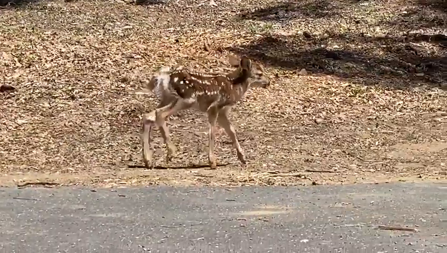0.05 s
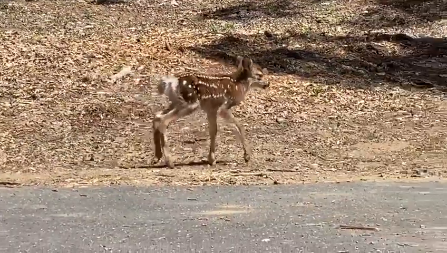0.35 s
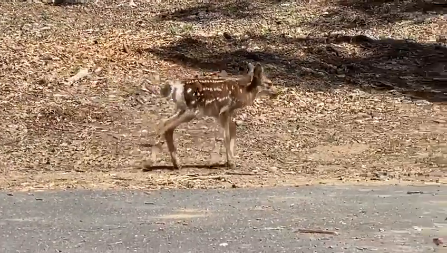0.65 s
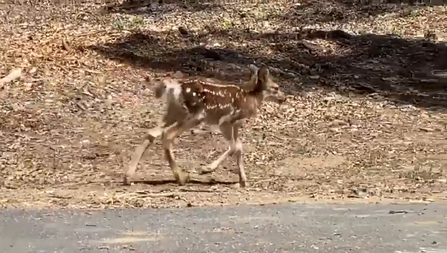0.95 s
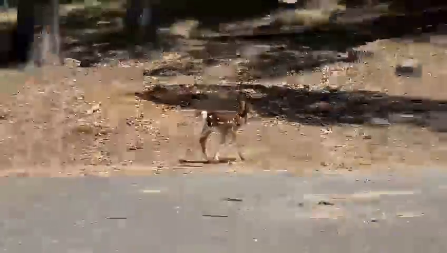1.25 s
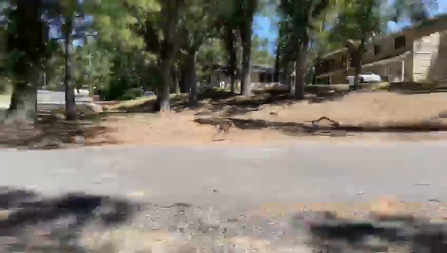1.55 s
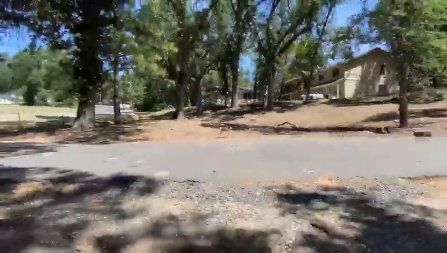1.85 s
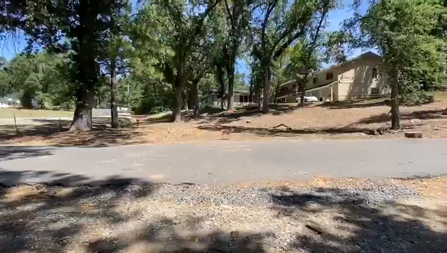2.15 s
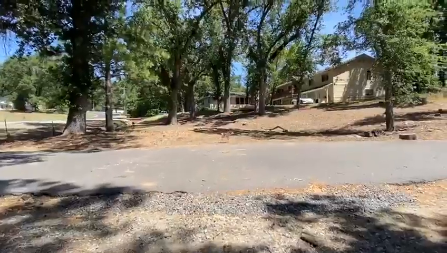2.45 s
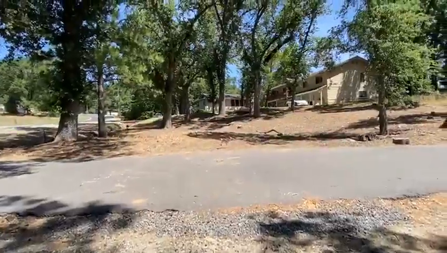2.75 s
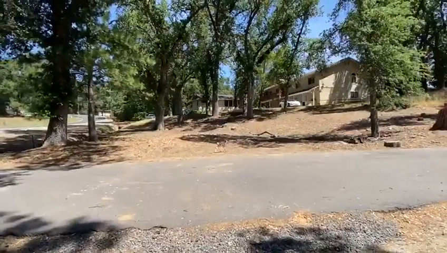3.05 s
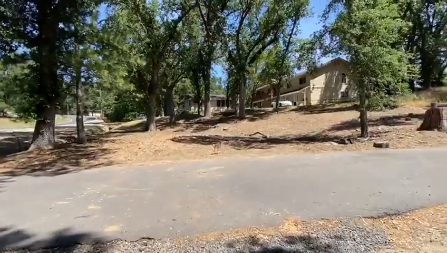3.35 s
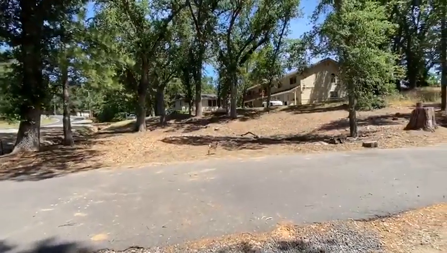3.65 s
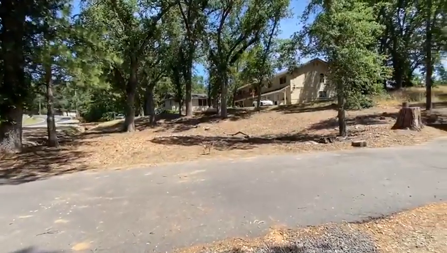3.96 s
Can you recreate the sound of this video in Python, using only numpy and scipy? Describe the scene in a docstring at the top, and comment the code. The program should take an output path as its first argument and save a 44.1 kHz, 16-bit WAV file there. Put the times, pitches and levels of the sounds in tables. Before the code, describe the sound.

A young deer bleats once, short and nasal, over soft outdoor air and a low, faraway machine hum. Close handling noise follows: skin slides on the microphone's case and the grip creaks in quick, sharp ticks.

```python
"""Beside a quiet wooded road, a fawn gives one thin, arching bleat, a harmonic tone shaped by the
resonances of mouth and nose. Before it come the dying end of an earlier bleat, a faint chirp and a far,
hoarse call, all over soft air and the low hum of distant machinery. Then a hand shifts on the recorder:
sliding skin makes friction noise, and stick-slip of the grip rings the modes of the case in sharp
double ticks, about six a second, nearer the left microphone port."""
import sys
import numpy as np
from scipy import signal
from scipy.fft import rfft, irfft
from scipy.io import wavfile
from scipy.ndimage import uniform_filter1d

SR = 44100
rng = np.random.default_rng(int(sys.argv[2]) if len(sys.argv) > 2 else 0)


def generate_wav(sig):
    """Save sig (samples, or channels by samples) to the path in sys.argv[1] as 16-bit PCM at SR."""
    pcm = np.round(np.clip(np.atleast_2d(sig).T, -1, 1) * 32767).astype(np.int16)
    wavfile.write(sys.argv[1], SR, pcm)


N = 176400
TIME = np.arange(N) / SR
PORT_LAG_S = .00013  # the hand's sounds reach the right port later


def undb(db):
    """Amplitude ratio of a level."""
    return 10 ** (np.asarray(db) / 20)

def unit(x):
    """Normalisation to rms 1."""
    return x / np.sqrt(np.mean(x ** 2))

def curves(rows):
    """Linear interpolation of each column of a time table."""
    times, *columns = np.array(rows, float).T
    return [np.interp(TIME, times, column) for column in columns]

def gain_at(hz, envelope):
    """Gain of a spectral envelope, interpolated in log frequency."""
    f, db = np.array(envelope, float).T
    return undb(np.interp(np.log(hz + 1e-3), np.log(f), db))

def wander(rate_hz):
    """Smooth random modulation with a spread near 1."""
    k = int(SR / rate_hz)
    steps = np.repeat(rng.standard_normal(N // k + 1), k)
    return 1.34 * uniform_filter1d(uniform_filter1d(steps, k), k)[:N]

def colour(x, envelope):
    """Filtering by a spectral envelope, to rms 1."""
    return unit(irfft(rfft(x) * gain_at(np.fft.rfftfreq(N, 1 / SR), envelope), N))

def noise(correlation):
    """Partly correlated white noise at the two ports."""
    common = np.sqrt(correlation) * rng.standard_normal(N)
    return common + np.sqrt(1 - correlation) * rng.standard_normal((2, N))

def pan(db):
    """Gains for a level difference, left over right."""
    return undb(np.array([[db], [-db]]) / 2)

def delay(x, seconds):
    """Fractional delay by linear phase shift."""
    return irfft(rfft(x) * np.exp(-2j * np.pi * np.fft.rfftfreq(N, 1 / SR) * seconds), N)

def reverberate(x, decay_s):
    """Convolution with exponentially decaying diffuse reflections."""
    cloud = rng.standard_normal(SR // 2) * np.exp(-np.arange(SR // 2) / SR / decay_s)
    return signal.fftconvolve(x, cloud / np.linalg.norm(cloud))[:N]


# Partials of the hum: f/Hz, level/dB, modulation depth/dB
HUM_PARTIALS = [(53.8, -56, -0.5), (75.9, -61.5, 4.5), (107.5, -69, 9), (121.5, -66, 4), (161.2, -75, -1.5)]
# Spectral envelope of the rumble: f/Hz, relative level/dB
RUMBLE_SPECTRUM = [(20, -20.5), (40, 2.5), (62, 5.5), (85, 1.5), (130, -1), (200, -19.5), (400, -51.5)]
# Slow fading of both: t/s, relative level/dB
MACHINE_FADE = [(0, -0.5), (1.5, -2.5), (2.8, -2), (3.1, -10), (3.6, -6.5), (4, -4)]

def machinery():
    """Random amplitude and frequency modulation makes a distant hum waver over low rumble."""
    hum = 0
    for hz, db, depth_db in HUM_PARTIALS:
        phase = 2 * np.pi * np.cumsum(hz * (1 + .0087 * wander(5.88))) / SR
        hum += np.sqrt(2) * undb(db + depth_db * np.tanh(wander(6.6))) * np.sin(phase)
    rumble = undb(-61) * colour(noise(correlation=.2), RUMBLE_SPECTRUM)
    return (hum + rumble) * pan(db=-1) * undb(curves(MACHINE_FADE)[0])


# Spectral envelope of outdoor air: f/Hz, relative level/dB
AIR_SPECTRUM = [(100, -13.5), (160, -5), (350, -7), (550, -12.5), (950, -14.5), (1400, -22.5),
                (2000, -25.5), (2700, -34), (4500, -40.5), (7000, -42), (9000, -70), (11000, -79)]

def air(level_db=-68, swell_db=1):
    """Broadband ambient noise swells slightly under slow amplitude modulation."""
    hush = colour(noise(correlation=.71), AIR_SPECTRUM)
    return hush * undb(level_db + swell_db * np.tanh(wander(1.86)))


# The earlier bleat's end, then the full bleat: t/s, f/Hz, level/dB of fundamental, mouth and nasal buzz
DYING_BLEAT = [(0, 886, -69, -62, -78), (.04, 830, -81, -73.5, -101), (.08, 825, -98, -88, -100)]
FULL_BLEAT = [(1.62, 914, -74, -84, -80), (1.634, 930, -71, -74, -66.5), (1.654, 1030, -60, -63.5, -54.5),
              (1.676, 1042, -56.5, -64, -55.5), (1.70, 1060, -60, -57.5, -62),
              (1.733, 1060, -60.5, -54.5, -62), (1.747, 1055, -64, -65, -63.5),
              (1.77, 1025, -60.5, -59, -58), (1.792, 1019, -62.5, -55, -69), (1.801, 980, -62, -41.5, -62),
              (1.822, 950, -67, -44, -65.5), (1.848, 880, -75, -52.5, -69), (1.875, 870, -70, -57, -80.5),
              (1.91, 830, -74, -81, -100)]
# Spectral envelopes of the mouth and of the nasal buzz: f/Hz, relative level/dB
MOUTH_FORMANTS = [(1650, -2), (1900, 0), (2150, -3), (2550, -27), (2850, -24.5), (3200, -16), (3400, -36.5),
                  (3750, -19.5), (4100, -57), (4750, -29), (5700, -41), (6600, -26), (7600, -49)]
NASAL_SPECTRUM = [(5000, -82), (6300, -37), (7100, -25), (7450, -3.5), (7800, -12), (8400, -6), (9000, -8),
                  (9450, -1.5), (10000, -3), (10600, -4.5), (11300, -42)]

def fawn(call, opens_s, overtone_db, phase_spread, opening_s=.073, jitter=.003, shimmer_db=.9):
    """Source and filter: mouth and nose weight a harmonic voice, which rasps as the mouth opens."""
    hz, fundamental_db, mouth_db, buzz_db = curves(call)
    hz = uniform_filter1d(hz, size=SR // 70) * (1 + jitter * wander(150))
    opening = np.clip((TIME - opens_s) / opening_s, 0, 1)
    nasal_hz = np.where(TIME > opens_s - .13, 8300, 9900)  # the nasal resonance steps down
    rasp_rate_hz = 521.2
    rasp = .13 * np.maximum(opening, .12) * wander(rasp_rate_hz)
    phase = 2 * np.pi * np.cumsum(hz) / SR + rasp / 3
    voiced = (TIME > call[0][0]) & (TIME < call[-1][0])
    envelope = np.sqrt(2) * uniform_filter1d(1. * voiced, SR // 200)
    envelope *= (1 + rasp) * undb(shimmer_db * wander(65))
    oral = undb(fundamental_db) * np.sin(phase)
    oral += undb(mouth_db) * gain_at(2 * hz, MOUTH_FORMANTS) * np.sin(2 * phase)
    buzz = 0
    for k in range(3, 14):
        muffle_db = (-20 if k > 3 else -3) * (1 - opening)  # a closed mouth damps the overtones
        hoarse = np.sin(k * phase + phase_spread * (1 + opening) / 2 * wander(rasp_rate_hz))
        oral += hoarse * gain_at(k * hz, MOUTH_FORMANTS) * undb(mouth_db + overtone_db + muffle_db)
        peak_db = 7 * np.exp(-((k * hz - nasal_hz) / 670) ** 2)
        flicker_db = 2.8 * wander(44.43)
        buzz += np.sin(k * phase) * gain_at(k * hz, NASAL_SPECTRUM) * undb(buzz_db + peak_db + flicker_db)
    return envelope * (oral * pan(db=-2.5) + buzz * pan(db=9.5))

def woods(voice, echo_db=-15.5, t60_s=.14, echo_delay_s=.018):
    """Scattering by the trees adds a short reverberation to the direct sound."""
    left, right = voice
    direct = np.array([left, delay(right, seconds=.00005)])
    echo = [delay(reverberate(side, t60_s / np.log(1000)), echo_delay_s) for side in voice]
    return direct + undb(echo_db) * np.array(echo)


def bird(at_s=.194, half_length_s=.035, hz=4720, peak_db=-85):
    """A frequency-modulated tone under a Gaussian envelope makes one thin, distant chirp."""
    phase = 2 * np.pi * np.cumsum(hz * (1 + .022 * wander(400))) / SR
    return undb(peak_db) * np.exp(-((TIME - at_s) / half_length_s) ** 2) * np.sin(phase)


# Contour of the far call: t/s, f/Hz, level/dB
FAR_CONTOUR = [(.48, 1567, -101), (.525, 1550, -81), (.61, 1603, -73.5), (.7, 1573, -75),
               (.81, 1544, -73.5), (.88, 1570, -75), (1.0, 1523, -75), (1.13, 1512, -74), (1.24, 1450, -91)]
# Spectral envelope of its hoarseness: f/Hz, relative level/dB
HOARSE_SPECTRUM = [(700, -31), (1200, -3.5), (1650, 3), (1950, -7), (2400, -25.5), (4000, -38)]

def far_call(waver=.03, hoarse_db=2.5):
    """Scattering by trees blurs a wavering note far to the left; a band of noise makes it hoarse."""
    hz, db = curves(FAR_CONTOUR)
    phase = 2 * np.pi * np.cumsum(hz * (1 + waver * wander(90.3))) / SR
    note = unit(reverberate(np.sin(phase), decay_s=.023))
    hoarseness = undb(hoarse_db) * colour(noise(correlation=.6), HOARSE_SPECTRUM)
    return unit(note + hoarseness) * undb(db) * pan(db=8)


# Slips of the grip: t/s, level/dB, tilt/(dB per octave), accent level/dB, accent f/Hz
GRIP_SLIPS = [(.517, -65, 11, -1, 5000), (1.09, -58, -8, 9, 560), (1.313, -58, 2, 4, 1430),
              (1.484, -53, -10, 17.5, 1900), (1.9965, -35, -2, 10.5, 1430), (2.2275, -37, -10.5, 15, 1300),
              (2.2555, -39.5, 8.5, 14.5, 1430), (2.4905, -33, 2.5, 12, 1470),
              (2.5502, -23.5, 4.5, 25, 1520), (2.6372, -26.5, -0.5, 14, 1400),
              (2.6680, -17, -4.5, 11.5, 1430), (2.6884, -19.5, -0.5, 0, 1430), (2.7317, -4.5, 0, 11.5, 990),
              (2.7895, -30.5, 4.5, 13, 1430), (2.8949, 2, -0.5, 7, 875), (2.8968, -19, 6.5, 0.5, 8500),
              (2.9032, -18.5, 4.5, 3, 1430), (3.0409, -2.5, -0.5, 5.5, 3950), (3.0442, -3.5, -1, -3, 1900),
              (3.1944, -10, -2.5, 18, 1140), (3.1963, -17.5, -9, -1, 950), (3.2009, -3, -0.5, 4.5, 875),
              (3.3530, -27, -11, -6, 1310), (3.3544, -6.5, -2.5, 10, 4360), (3.3612, -3.5, -2, 4, 1000),
              (3.5165, -17.5, 3, 3, 3400), (3.5186, -5.5, -3, 5.5, 1420), (3.5224, -15, -3, 8, 330),
              (3.6858, -31, 13, -4, 7000), (3.6867, -2, 0.5, 8.5, 1250), (3.6896, -11, -5, 3, 1430),
              (3.6921, -5.5, -3.5, -2, 437), (3.8627, -11.5, -2, 1, 1630),
              (3.8679, -10.5, -2.5, 13.5, 5000), (3.9575, -27.5, -5, 15.5, 1480)]
# Modes of the case: f/Hz, bandwidth/Hz, level/dB, right port relative to left/dB
CASE_MODES = [(330, 276, -3, -4.5), (584, 204, -4, -12), (949, 453, 1.5, -9), (1364, 386, 0.5, -3),
              (1900, 900, 3, 1), (3410, 920, 7.5, -15.5), (4264, 1280, 4.5, -12), (5075, 560, 5, -9),
              (5530, 430, -1.5, -20), (7200, 1040, 0.5, -17.5), (8970, 650, -5, -8),
              (10580, 820, -16.5, 2.5)]

def grip_creaks(squeak_s=2.7355, squeak_hz=1369.5, grit_db=-3.5, accent_octaves=.38):
    """Stick-slip friction: each slip is a gritty impulse that rings the modes, slightly detuned."""
    # seven rapid slips fuse into one squeak
    squeak = [(squeak_s + k / squeak_hz, -11, -3.5, 14, 1412) for k in range(7)]
    age = np.arange(-(SR // 200), SR // 50) / SR
    rise_s, decay_s = .0009, .00081
    ports = np.zeros((2, N + len(age)))
    for at_s, slip_db, tilt_db, accent_db, accent_hz in GRIP_SLIPS + squeak:
        grit = rng.standard_normal(len(age)) * np.exp(np.minimum(age / rise_s, -age / decay_s))
        push = (age == 0) + undb(grit_db) * grit / np.linalg.norm(grit)
        detune = 1 + .035 * rng.standard_normal()
        start = int((at_s + age[0]) * SR)
        for k, (hz, width_hz, mode_db, right_db) in enumerate(CASE_MODES):
            contact_db = accent_db * np.exp(-(np.log2(hz / accent_hz) / accent_octaves) ** 2)
            gain = undb(slip_db + mode_db + tilt_db * np.log2(hz / 2000) + contact_db)
            resonator = signal.iirpeak(hz * detune, hz / width_hz, fs=SR)
            mode = (-1) ** k * signal.lfilter(*resonator, signal.lfilter(*resonator, push))
            ports[:, start:start + len(age)] += gain * mode * undb([[0], [right_db]])
    return np.array([ports[0, :N], delay(ports[1, :N], PORT_LAG_S)])

def case_response(ticks, ring_db=-12.5, ring_top_hz=2500, gap_hz=2530, gap_width_hz=210):
    """Free decay and antiresonance: the case's low modes linger, and a notch lies between two modes."""
    tails = [reverberate(side, decay_s=.007) for side in ticks]
    ring = undb(ring_db) * signal.lfilter(*signal.butter(1, ring_top_hz, fs=SR), tails)
    hollow = signal.lfilter(*signal.iirnotch(gap_hz, gap_hz / gap_width_hz, fs=SR), ticks + ring)
    return signal.sosfilt(signal.butter(2, [200, 10500], "band", fs=SR, output="sos"), hollow)


# Course of the rubbing: t/s, scuff level/dB, hiss level/dB
RUB_LEVELS = [(1.6, -110, -130), (1.85, -66, -83), (2.05, -67.5, -85.5), (2.09, -62, -73.5),
              (2.2, -63, -72), (2.38, -56.5, -64), (2.52, -64, -69), (2.6, -61, -67.5), (2.7, -59, -67.5),
              (2.83, -61.5, -67), (3.0, -58, -64.5), (3.15, -60, -66), (3.3, -61.5, -67.5),
              (3.45, -62, -73), (3.62, -62, -71.5), (3.78, -62.5, -65.5), (3.9, -60, -67),
              (4.0, -61.5, -66.5)]
# Harder scrapes: t/s, half length/s, level/dB
SCRAPE_SWELLS = [(2.232, 0.013, -64), (2.394, 0.025, -65), (3.808, 0.074, -57.5), (3.975, 0.026, -56.5)]
# Spectral envelopes of scuff, hiss and scrape: f/Hz, relative level/dB
SCUFF_SPECTRUM = [(120, -8), (280, 2), (700, 1), (1300, 0), (1900, -5.5), (2700, -13), (4000, -41)]
HISS_SPECTRUM = [(1500, -8), (2800, 1), (3700, -2.5), (4700, 0.5), (5800, -3), (7100, 1.5), (8500, -6),
                 (9700, -12.5), (11000, -38.5)]
SCRAPE_SPECTRUM = [(400, -35), (700, 9), (1000, 0.5), (1600, 6), (2050, 2), (2450, -10), (2900, 2.5),
                   (3700, -18), (4700, -17), (6500, -26)]

def skin_rubbing(catches_per_s=900, spread_db=7):
    """Sliding friction: skin on the case makes noise full of tiny catches, modulated by its pressure."""
    scuff_db, hiss_db = curves(RUB_LEVELS)
    catches = (rng.random(N) < catches_per_s / SR) * rng.standard_normal(N)
    catches = unit(catches * undb(spread_db * np.minimum(rng.exponential(size=N), 2)))
    grains = undb(-8) * np.array([catches, delay(catches, PORT_LAG_S)])
    pressure = undb(2.3 * wander(45))
    scuff = colour(noise(correlation=.37) + grains, SCUFF_SPECTRUM) * undb(scuff_db)
    hiss = colour(noise(correlation=.028) + grains, HISS_SPECTRUM) * undb(hiss_db)
    swells = sum(undb(db) * np.exp(-((TIME - at_s) / half_s) ** 2) for at_s, half_s, db in SCRAPE_SWELLS)
    scrape = colour(noise(correlation=.7) + undb(4.5) * grains, SCRAPE_SPECTRUM) * swells
    return pressure * (scuff + hiss * pan(db=9) + scrape * pan(db=-1.5))


def scene():
    """Superposition of the fawn, the hand and the surroundings."""
    bleats = woods(fawn(FULL_BLEAT, opens_s=1.785, overtone_db=2, phase_spread=.8))
    bleats += woods(fawn(DYING_BLEAT, opens_s=-.073, overtone_db=14.5, phase_spread=1.5))
    hand = case_response(grip_creaks()) + skin_rubbing()
    return bleats + hand + machinery() + air() + far_call() + bird()

def record(dry):
    """Band limiting: a steep low-pass filter cuts the treble above 11.4 kHz."""
    return signal.sosfilt(signal.ellip(8, .2, 70, 11400, fs=SR, output="sos"), dry)


dry = scene()
out = record(dry)
generate_wav(out)
```